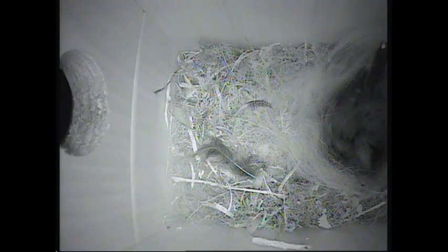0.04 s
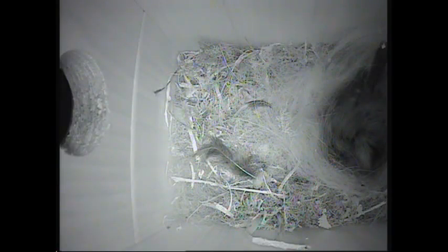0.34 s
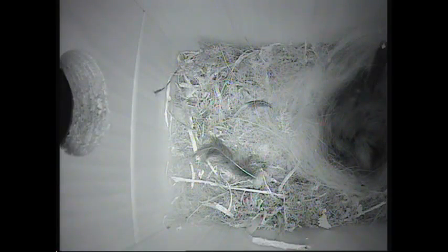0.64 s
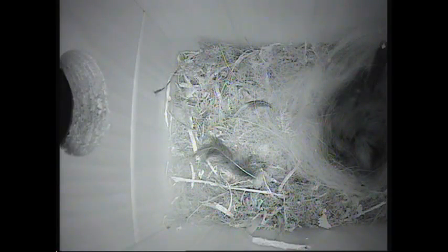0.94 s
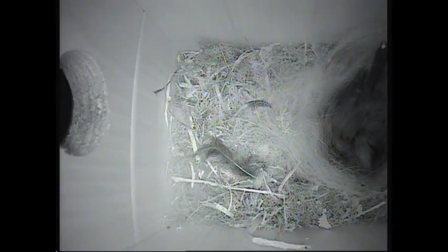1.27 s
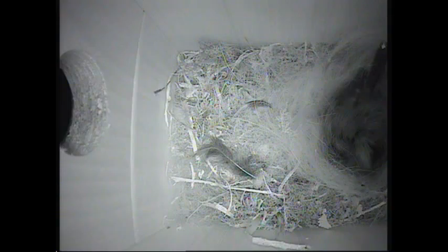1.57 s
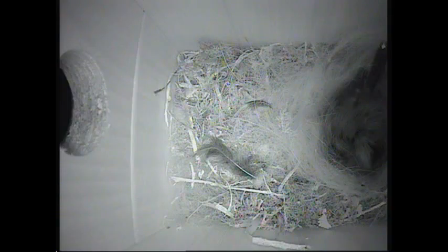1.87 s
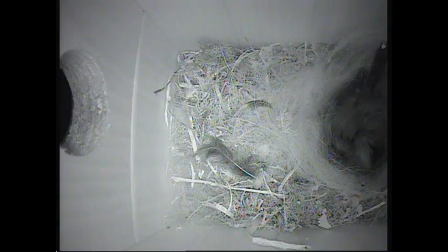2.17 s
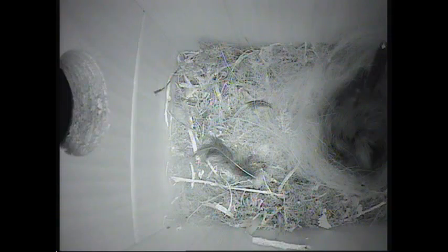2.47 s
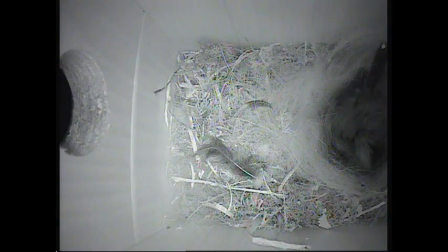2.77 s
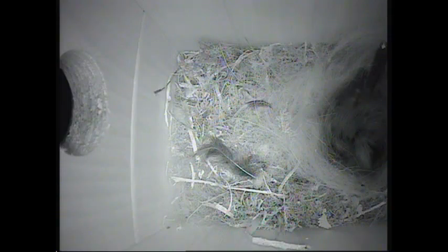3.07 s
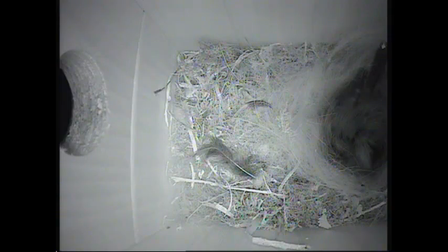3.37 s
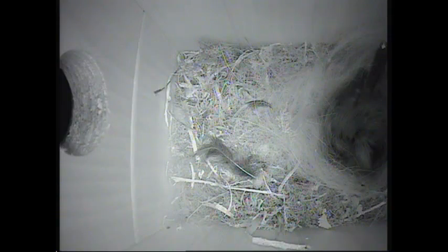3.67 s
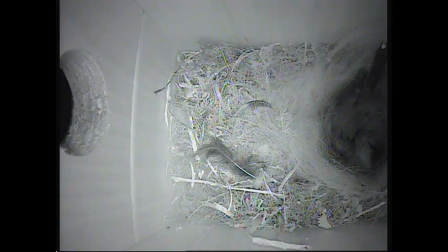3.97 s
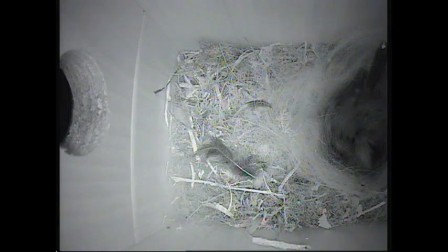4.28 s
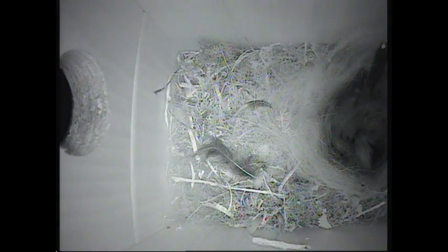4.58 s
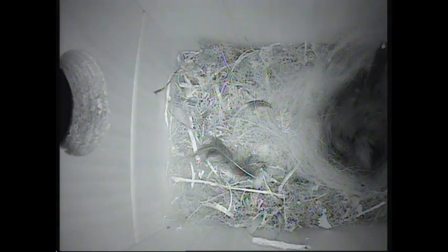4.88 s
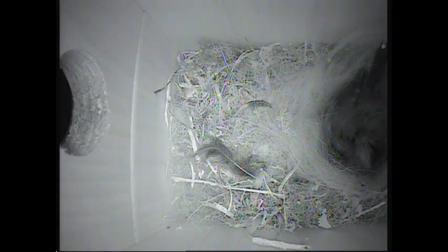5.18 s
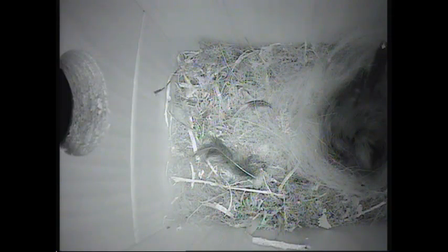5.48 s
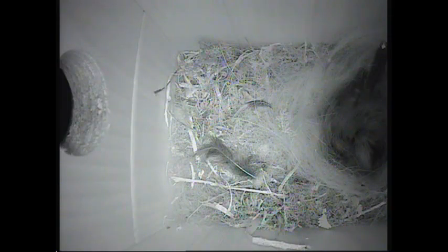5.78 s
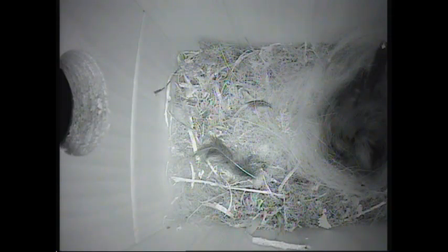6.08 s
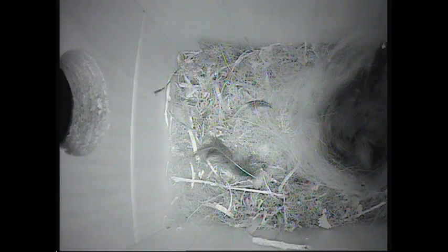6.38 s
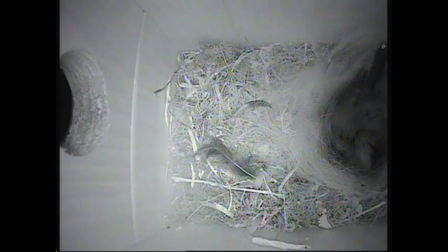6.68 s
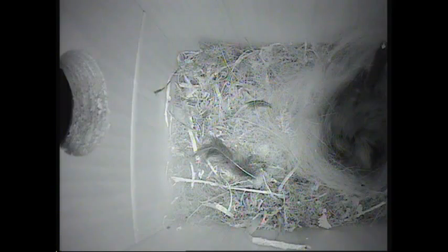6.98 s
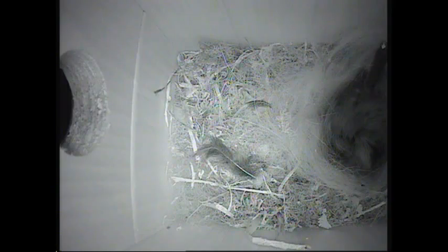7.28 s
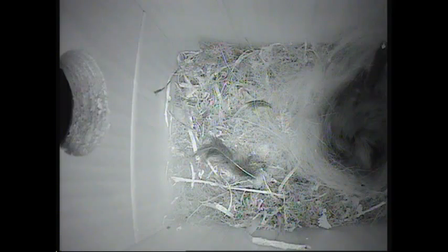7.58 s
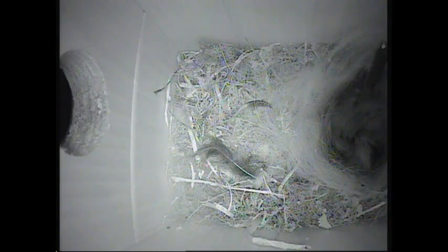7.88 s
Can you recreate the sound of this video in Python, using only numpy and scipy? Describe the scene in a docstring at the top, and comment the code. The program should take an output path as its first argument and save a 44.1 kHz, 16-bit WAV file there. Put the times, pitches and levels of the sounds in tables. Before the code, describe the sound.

Steady low buzz from a small nest box microphone, with soft hiss, a faint high whine and a far engine droning underneath.

```python
"""A low, buzzing hum with a ticking edge, on the left only: a small camera's microphone in a quiet nest box.
The picture signal leaks into the sound: every field gives a low thud and a few sharp sync ticks,
and thin tones whine between them. Underneath lie amplifier hiss, outside air sounding the hollow box
and the faint drone of a far engine going by. The right channel holds only a trace of hum and noise."""
import sys
import numpy as np
from scipy import signal
from scipy.fft import rfft, irfft
from scipy.io import wavfile
from scipy.ndimage import uniform_filter1d

SR = 44100
rng = np.random.default_rng(int(sys.argv[2]) if len(sys.argv) > 2 else 0)


def wav_record(signal):
    """Record a signal, one row per channel, as 16-bit PCM in the file named by sys.argv[1]."""
    frames = np.transpose(np.atleast_2d(signal))
    bounded = np.clip(frames, -1, 1)
    # unit amplitude maps onto the largest positive 16-bit level
    quanta = np.round(bounded * 32767).astype(np.int16)
    wavfile.write(sys.argv[1], SR, quanta)


N = 358974
T = np.arange(N) / SR
FIELD_HZ, FIELD_START_S = 49.9965, .0052


def undb(db):
    """Decibels to gain."""
    return 10 ** (np.asarray(db) / 20)


def unit(x):
    """Scale to rms 1."""
    return x / np.sqrt(np.mean(x ** 2))


def causal(gain):
    """The response with these gains that starts at once and then dies away."""
    cepstrum = irfft(np.log(gain))
    half = len(cepstrum) // 2
    cepstrum[1:half] *= 2
    cepstrum[half + 1:] = 0
    return np.exp(rfft(cepstrum))


def colour(x, points):
    """EQ a white signal of rms 1 to a curve of (f/Hz, level/dB per Hz) points."""
    hz, db = np.transpose(points)
    gain = undb(np.interp(np.log(np.fft.rfftfreq(N, 1 / SR) + 1), np.log(hz), db))
    return irfft(rfft(x) * causal(gain), N) * np.sqrt(SR / 2)


def ringing(hz, width_hz):
    """Noise of rms 1 in one steep resonance."""
    f = np.fft.rfftfreq(N, 1 / SR) + 1e-6
    response = 1 / (1 + 1j * (f * f - hz * hz) / (f * width_hz))
    return unit(irfft(rfft(rng.standard_normal(N)) * response ** 2, N))


def drift(rate_hz):
    """Smooth random modulation of rms 1."""
    hold = int(SR / rate_hz)
    stairs = np.repeat(rng.standard_normal(N // hold + 1), hold)
    return unit(uniform_filter1d(uniform_filter1d(stairs, hold), hold)[:N])


def step(age_s):
    """An edge that rises from 0 to 1 within one sample."""
    return np.clip(age_s * SR, 0, 1)


def since(offset_s):
    """Seconds since a given moment of the picture field last came round."""
    return (T - FIELD_START_S - offset_s) % (1 / FIELD_HZ)


# Sync pulses riding on the blanking pulse: t/s into the field, length/s, height/share of blanking pulse
SYNC_PULSES = [(.0029, .00023, -.55), (.00447, .00013, .5)]


def field_hum(leak_db=-28, hold_s=.00334, slide_s=.00152, coupling_hz=28, coupling_q=.58,
              rolloff_hz=414, stray_db=-17):
    """Blanking and sync pulses leak in as dull thuds; the coupling stage makes them droop and swing back."""
    age = since(0)
    blanking = step(age) * np.clip(1 - (age - hold_s) / slide_s, 0, 1)
    sync = sum(height * (step(age - at_s) - step(age - at_s - length_s))
               for at_s, length_s, height in SYNC_PULSES)
    w = 2 * np.pi * coupling_hz
    highpass = signal.bilinear([1, 0, 0], [1, w / coupling_q, w * w], SR)
    coupled = signal.lfilter(*highpass, blanking + sync)
    pole = np.exp(-2 * np.pi * rolloff_hz / SR)
    thuds = signal.lfilter([1 - pole], [1, -pole], coupled)
    bare_edges = undb(stray_db) * coupled  # stray coupling bypasses the roll-off
    return undb(leak_db) * (thuds + bare_edges)


# EQ curve of the fizz on the sync edges: f/Hz, level/dB per Hz
TICK_EQ = [(1000, -106), (1500, -100), (2300, -102), (3100, -104), (4200, -105.5), (6000, -108),
           (9500, -107), (11200, -112), (12400, -106), (13600, -111)]


def sync_ticks(decay_s=.00017, beat_hz=2.23, fresh_noise=.54):
    """Every sharp edge leaves a short fizz, which nearly repeats from field to field and beats slowly."""
    edges = [(.000078, 1)]  # the blanking pulse's attack: t/s, size
    for at_s, length_s, height in SYNC_PULSES:
        edges += [(at_s, abs(height)), (at_s + length_s, abs(height))]
    gate = np.sqrt(sum(size * np.exp(-2 * since(at_s) / decay_s) for at_s, size in edges))
    looped_phase = rng.random(SR)[(since(0) * SR).astype(int)]
    looped_grain = unit(np.cos(2 * np.pi * (looped_phase + beat_hz * T)))
    grain = looped_grain + fresh_noise * rng.standard_normal(N)
    return colour(unit(gate * grain), TICK_EQ)


# Partials of the electronic whine: f/Hz, level/dB rms before waver and ducking
WHINE_TONES = [(3930, -82.5), (7827, -78), (10774, -75.5), (11726, -75.5), (12274, -74.5), (12888, -82),
               (13226, -76.5)]


def whine(blank_s=.0025, duck_db=-8, waver_db=.9):
    """Thin, high electronic tones waver in level and duck while the picture is blanked."""
    tones = sum(undb(db + waver_db * drift(9.8)) * np.sin(2 * np.pi * (hz * T + rng.random()))
                for hz, db in WHINE_TONES)
    return np.sqrt(2) * tones * undb(duck_db * (since(0) < blank_s))


# Wavering tones of the sizzle: f/Hz, level/dB rms before the throb
SIZZLE_TONES = [(3770, -75), (4025, -73)]


def sizzle(flare_at_s=.0033, decay_s=.0023, sustain=.15, wander_rad=1.44,
           throb_hz=2.23, throb_db=3.1, crest_s=.2):
    """Two tones of unsteady phase flare up as the blanking ends, and throb slowly."""
    throb = undb(throb_db * np.cos(2 * np.pi * throb_hz * (T - crest_s)))
    flare = unit(sustain + np.exp(-since(flare_at_s) / decay_s))
    tones = sum(undb(db) * unit(np.sin(2 * np.pi * hz * T + wander_rad * drift(13)))
                for hz, db in SIZZLE_TONES)
    return flare * throb * tones


# EQ curve of the noise bed, from air rumble up to amplifier hiss: f/Hz, level/dB per Hz
BED_EQ = [(15, -80), (28, -75), (90, -68), (200, -80.5), (330, -85.0), (650, -88.5), (950, -90.5),
          (1100, -91.5), (3000, -99.0), (6500, -105.0), (10200, -106.0), (11300, -109.0), (12300, -102.0),
          (13300, -104.0)]


def hiss_and_rumble(flicker_db=.39):
    """Amplifier hiss over the low rumble of the air outside; the level flickers slightly."""
    return colour(rng.standard_normal(N) * undb(flicker_db * drift(9)), BED_EQ)


# Resonances around the engine's note: f/Hz, width/Hz, level/dB relative to the note
ENGINE_MODES = [(127.34, 14.6, -3), (112.9, 29.4, -3), (143, 23.5, -9.5), (171.7, 9.7, -19.5),
                (233.3, 45, -22)]
# Swells of the engine under load: t/s at the crest, half length/s, level/dB of boost
ENGINE_SURGES = [(2.38, 0.14, 4), (3.45, 0.14, 5), (4.443, 0.18, 3), (6.134, 0.057, 7), (6.9, 0.33, 1.5)]


def far_engine(note_hz=129.3, wander_rad=1.0, nearest_db=-41, nearest_s=5.36, half_power_s=2):
    """A far engine drones through the walls, swelling and fading as it passes and surging under load."""
    note = unit(np.sin(2 * np.pi * note_hz * T + wander_rad * drift(9)))
    body = sum(undb(db) * ringing(hz, width) for hz, width, db in ENGINE_MODES)
    distance = np.hypot(1, (T - nearest_s) / half_power_s)  # 1 when nearest
    load_db = sum(db * np.exp(-((T - at_s) / half_s) ** 2) for at_s, half_s, db in ENGINE_SURGES)
    return unit(note + body) * undb(nearest_db + load_db) / distance


# Hollow resonances of the nest box: f/Hz, width/Hz, level/dB rms midway through the fade
BOX_MODES = [(745.5, 65, -69), (825.5, 53, -68.5)]


def box_hollow(fade_db=-3):
    """Outside air sounds the hollow of the box, easing off across the scene."""
    hollow = sum(undb(db) * ringing(hz, width) for hz, width, db in BOX_MODES)
    return hollow * undb(fade_db * (T / T[-1] - .5))


def idle_channel(mains_db=-79, buzz_db=-99, floor_gain_db=-122):
    """The unused input holds only a trace of mains hum, its odd harmonics and noise."""
    phase = 2 * np.pi * FIELD_HZ * T
    buzz = sum(np.sin(k * phase) / k for k in range(5, 21, 2))
    floor_eq = [(100, -2), (300, -.5), (2000, -9.5), (8000, -10.5), (8700, -20.5)]
    floor = colour(rng.standard_normal(N), floor_eq)
    return undb(mains_db) * unit(np.sin(phase)) + undb(buzz_db) * unit(buzz) + undb(floor_gain_db) * floor


def scene():
    """The camera on the left, the idle input on the right; every layer runs throughout."""
    interference = field_hum() + sync_ticks() + whine() + sizzle()
    bed = hiss_and_rumble() + far_engine() + box_hollow()
    return np.array([interference + bed, idle_channel()])


def record(dry, top_hz=13650):
    """A steep low-pass cuts the top of both channels."""
    return signal.sosfilt(signal.ellip(10, .1, 70, top_hz, fs=SR, output="sos"), dry)


dry = scene()
out = record(dry)
wav_record(out)
```